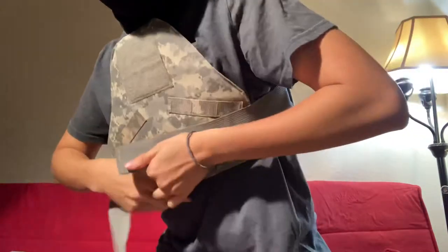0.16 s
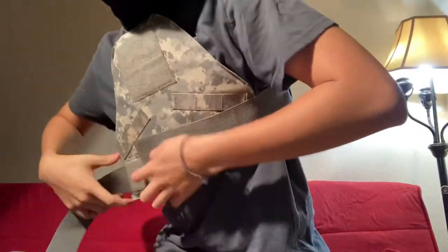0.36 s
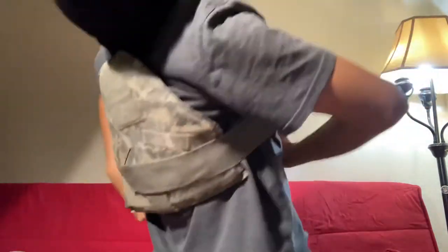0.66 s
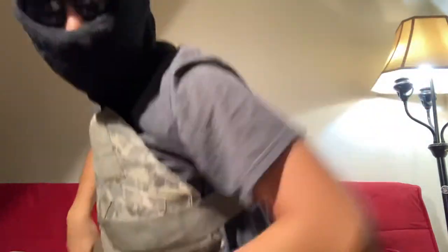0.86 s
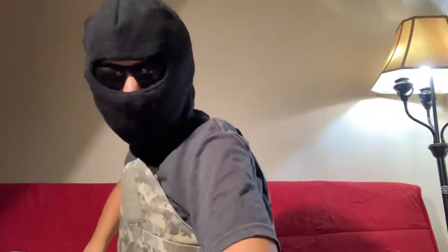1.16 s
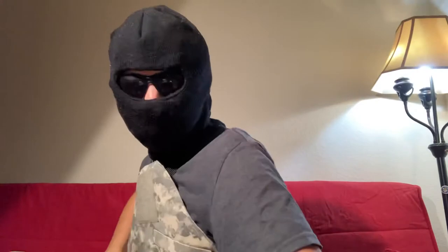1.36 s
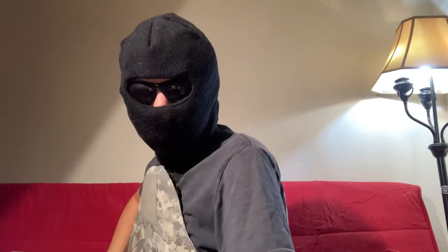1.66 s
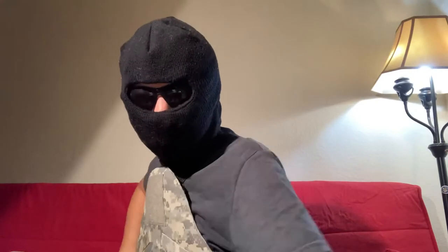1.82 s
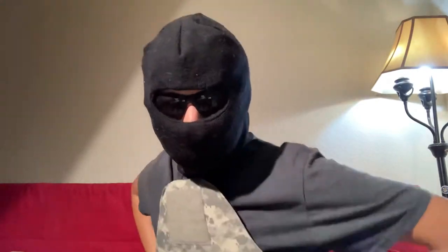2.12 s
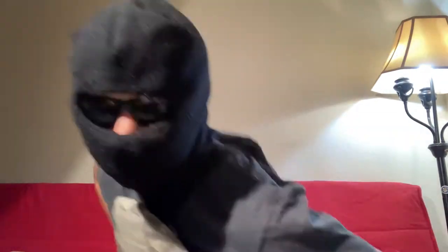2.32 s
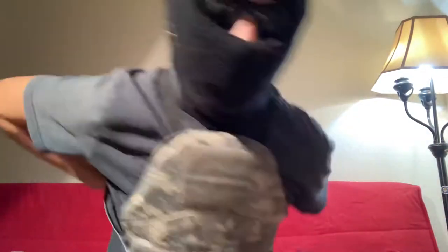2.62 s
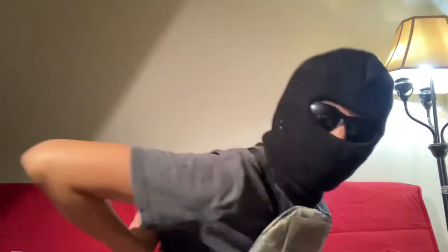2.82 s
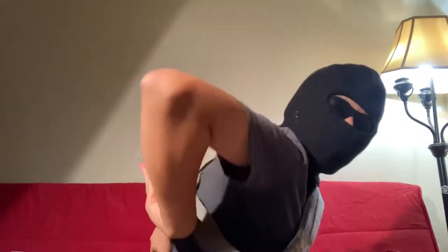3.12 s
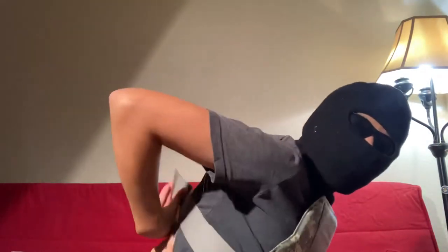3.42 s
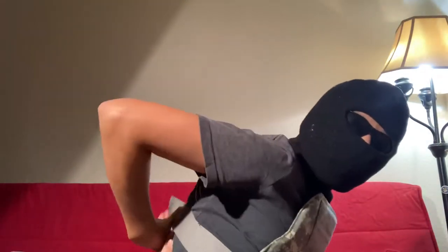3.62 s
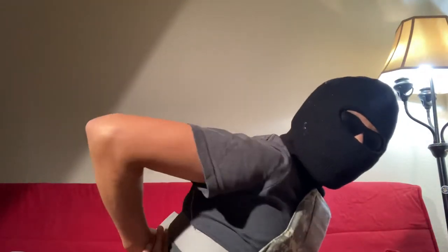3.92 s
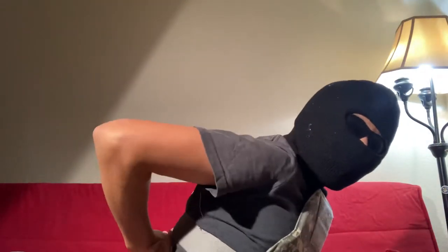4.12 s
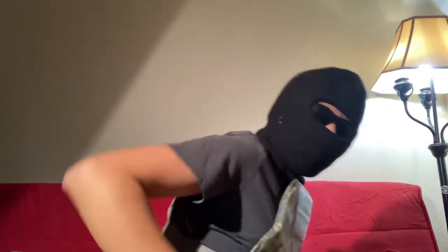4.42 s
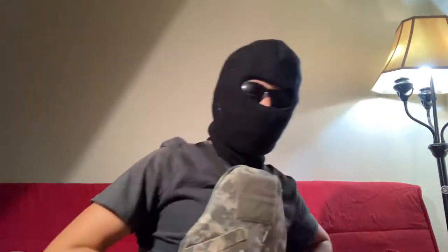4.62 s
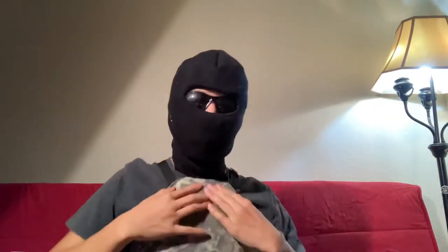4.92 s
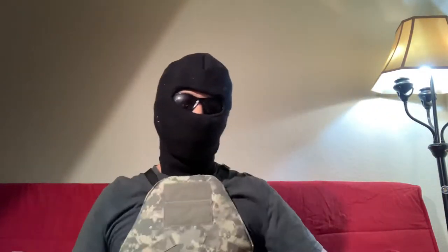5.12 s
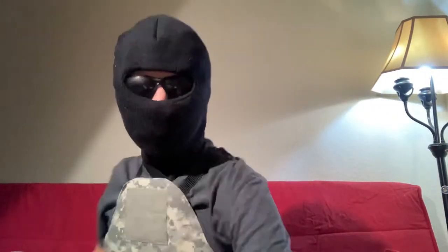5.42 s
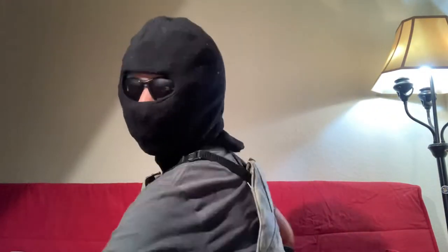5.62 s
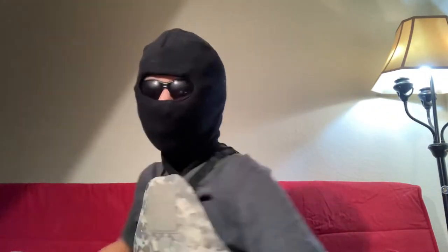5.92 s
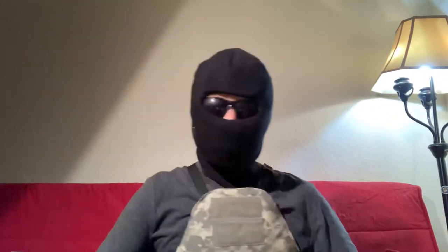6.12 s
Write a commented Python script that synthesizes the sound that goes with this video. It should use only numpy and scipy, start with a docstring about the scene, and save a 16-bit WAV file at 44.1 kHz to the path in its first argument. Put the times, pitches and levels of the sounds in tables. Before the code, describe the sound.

Hook-and-loop straps crackle and rip as a nylon vest is fastened close by, with cloth swishing and soft pats.

```python
"""A quiet living room, where someone fastens a small nylon vest close to a two-port microphone.
Hook-and-loop straps crackle and rip as fibres let go and shake the webbing. Cloth swishes over
cloth, the padding rumbles as the body shifts, and hands pat it with soft thuds. One thin, high
tone sounds early on. Reflections off arms and chest, a short echo and faint room tone surround it."""
import sys
import numpy as np
from scipy import signal
from scipy.fft import rfft, irfft
from scipy.io import wavfile
from scipy.ndimage import uniform_filter1d

SR = 44100
rng = np.random.default_rng(int(sys.argv[2]) if len(sys.argv) > 2 else 0)


def materialize(psi):
    """Save the field psi as 16-bit PCM at rate SR to the path in sys.argv[1].

    A 1-D psi becomes a single channel; in a 2-D psi each row is a channel.
    """
    bounded = np.clip(np.atleast_2d(psi).T, -1, 1)
    quanta = np.round(bounded * 32767).astype(np.int16)
    wavfile.write(sys.argv[1], SR, quanta)


N = 275914


def gain_of(db):
    return 10 ** (np.asarray(db) / 20)


def unit_rms(x):
    return x / np.sqrt(np.mean(x ** 2) + 1e-20)


def curve_at(points, hz):
    f, value = np.transpose(points)
    return np.interp(np.log(hz + 1), np.log(f + 1), value)


def automation(table):
    """Ramps between timed rows, one value per sample for each column."""
    times, *columns = np.transpose(table)
    return [np.interp(np.arange(N) / SR, times, column) for column in columns]


def colour(x, spectrum):
    """A causal EQ of unit energy: the spectrum sets only the tone."""
    log_gain = np.log(gain_of(np.maximum(curve_at(spectrum, abs(np.fft.fftfreq(4096, 1 / SR))), -70)))
    taps = np.fft.ifft(np.exp(signal.hilbert(log_gain).conj())).real[:2048]
    return signal.oaconvolve(x, taps / np.linalg.norm(taps))[:N]


def resonate(x, hz, width_hz):
    """A steep resonance swept along hz, scaled to keep the power of noise."""
    carrier, r = np.exp(2j * np.pi * np.cumsum(hz) / SR), np.exp(-np.pi * width_hz / SR)
    smooth = signal.lfilter([(1 - r) ** 2], [1, -2 * r, r * r], x / carrier)
    return (carrier * smooth).real * np.sqrt(8 / (1 - r))


def slips(per_s, spread_db, clump_db, clump_s):
    """Fibres slip as tiny clicks of random sign, a few large, coming in clumps."""
    size = gain_of(spread_db * np.minimum(rng.exponential(1, N), 3.6)) * rng.choice([-1., 1.], N)
    clumps = unit_rms(uniform_filter1d(rng.standard_normal(N), max(round(clump_s * SR), 2)))
    return unit_rms(size * (rng.random(N) < per_s / SR) * gain_of(clump_db * clumps))


# Strokes of hands and cloth over the vest:
# (start [s], rise [s], hold [s], fall [s], strap force [dB], cloth force [dB], webbing resonance [dB])
SLIDES = [(-.01, 0.014, 0.0044, 0.02, -60.5, -55, -6.5), (-.02, 0.0067, 0.41, 0.02, -68.5, -61.5, 5),
          (0.124, 0.061, .005, 0.08, -52, -57, 3), (0.417, 0.032, 0.066, 0.097, -77.5, -73, 3.5),
          (0.565, 0.036, .005, 0.19, -72.5, -67.5, 6), (0.684, 0.023, .02, 0.036, -76.5, -70, 3.5),
          (0.736, 0.08, 0.31, 0.044, -80, -64.5, 9.5), (0.864, 0.041, .005, 0.24, -62.5, -56.5, 2),
          (0.981, 0.045, 0.025, 0.15, -60.5, -61, 4.5), (1.137, 0.036, .01, 0.059, -48, -49.5, 3),
          (1.222, 0.032, 0.026, 0.023, -39.5, -46.5, 4), (1.342, .008, 0.068, 0.095, -49.5, -46.5, -0.5),
          (1.457, 0.031, 0.4, .05, -75, -79, -0.5), (1.64, 0.055, 0.29, 0.23, -68.5, -66, 2.5),
          (2.009, 0.02, 0.003, 0.053, -73.5, -50.5, 21), (2.133, 0.048, .005, 0.093, -71.5, -60, 12.5),
          (2.21, 0.061, .14, 0.11, -70, -64, 3.5), (2.415, 0.061, 0.36, 0.18, -70, -62.5, 5.5),
          (2.601, 0.08, 0.023, 0.17, -87, -53.5, 20), (2.695, 0.041, .005, 0.035, -68, -78, 8),
          (2.848, 0.065, 0.23, 0.16, -63, -63, 1.5), (2.986, 0.066, 0.0043, 0.076, -61, -43, 21),
          (3.126, 0.064, .005, 0.074, -57, -48.5, 3.5), (3.185, 0.047, 0.16, 0.039, -67, -64, 4),
          (3.359, 0.11, 0.014, 0.036, -51, -54.5, 2.5), (3.51, 0.015, 0.14, 0.063, -53.5, -66, 0.5),
          (3.611, 0.04, 0.0032, 0.064, -42.5, -46.5, 0), (3.71, 0.12, 0.078, .03, -66.5, -82, 0),
          (3.919, 0.02, .005, 0.31, -58.5, -76, -1), (4.1, 0.04, .005, 0.12, -57.5, -64.5, 2),
          (4.245, 0.057, 0.0057, 0.066, -63.5, -64, 1), (4.36, 0.024, 0.0036, 0.067, -91, -76.5, 12),
          (4.519, 0.013, .005, 0.14, -65, -60.5, 2.5), (4.587, 0.02, 0.11, 0.033, -92, -70.5, 10.5),
          (4.737, 0.015, 0.0029, 0.015, -52, -39, 5.5), (4.748, .02, 0.2, 0.018, -70, -69, 2),
          (4.983, 0.085, 0.045, .07, -72.5, -61, 11), (5.205, 0.12, 0.18, 0.07, -66.5, -54, 9.5),
          (5.294, 0.21, 0.065, 0.062, -65.5, -51.5, 11.5), (5.59, 0.031, 0.039, 0.0495, -85, -72, 8),
          (5.784, 0.11, 0.076, .1, -81.5, -65, 10.5), (5.824, 0.19, 0.21, 0.054, -69, -55, 8.5)]
def slides():
    """Each stroke swells, holds and fades; the strongest on the straps sets the webbing's resonance."""
    t, power = np.arange(0, N / SR + .01, .002), 1e-14
    ramp_db = 25  # travel over one rise or fall
    for start, rise, hold, fall, straps_db, cloth_db, webbing_db in SLIDES:
        attack = (start + rise - t) / max(rise, .005)
        release = (t - start - rise - hold) / max(fall, .005)
        dip_db = ramp_db * np.maximum(np.maximum(attack, release), 0)
        strap_power, cloth_power = gain_of(np.array([[straps_db], [cloth_db]]) - dip_db) ** 2
        power = power + np.array([strap_power, cloth_power, strap_power * webbing_db])
    pull, rub, webbing_db = np.sqrt(power[0]), np.sqrt(power[1]), power[2] / power[0]
    return [np.interp(np.arange(N) / SR, t, curve) for curve in (pull, rub, webbing_db)]


# Bite of the hooks and sizzle of the finest ones: (frequency [Hz], relative level [dB])
HOOK_EQ = [(2000, -61), (4000, -1), (5000, 8), (7000, 5.5), (9200, 1), (12500, -23)]
SIZZLE_EQ = [(6000, -48.5), (9500, 5), (11000, 10), (13000, 7.5), (15500, 8), (17000, -7.5)]
# Fader ride on the sizzle: (time [s], relative level [dB])
SIZZLE_RIDE = [(0, -5), (.8, 2.5), (1.2, 2), (1.45, 0.5), (2.0, -1.5), (2.9, -2), (3.7, -5), (4.4, -6.5),
               (5.0, -10), (6.26, -2)]
def straps(pull, tug, webbing_db):
    """Hissing loops and tearing hooks shake the webbing; slack webbing rings more, lower and duller."""
    sizzle_db = automation(SIZZLE_RIDE)[0] - 1.25 * webbing_db
    webbing_hz = 2865 - 36 * webbing_db
    force = np.hypot(pull, tug)
    # Hard, bright pulls tear hooks; dull slides do not.
    torn_share = np.clip(0.63 + 0.0084 * (20 * np.log10(force) + 65) - 0.065 * webbing_db, 0, .5)
    tearing = slips(per_s=1500, spread_db=2.6, clump_db=1.4, clump_s=0.005)
    loops = slips(per_s=14000, spread_db=1.5, clump_db=1.8, clump_s=0.011)
    drive = force * (np.sqrt(1 - torn_share) * loops + np.sqrt(torn_share) * tearing)
    ring = resonate(drive * gain_of(webbing_db), webbing_hz, width_hz=2400)
    webbing = signal.lfilter(*signal.butter(2, 1500, "high", fs=SR), ring)
    sizzle = colour(drive * gain_of(sizzle_db), SIZZLE_EQ)
    return gain_of(4) * colour(drive, HOOK_EQ) + gain_of(6) * sizzle + gain_of(-0.4) * webbing


# Tone of the weave and of the padding: (frequency [Hz], relative level [dB])
WEAVE_EQ = [(150, -43.5), (330, -17), (520, 0.5), (800, -4.5), (1150, 3), (1450, -0.5), (1850, -4.5),
            (3500, -19.5)]
PADDING_EQ = [(40, -45), (80, -16.5), (120, -0.5), (160, 0.5), (230, -13), (330, -6), (600, -33)]
# The body shifting under the vest: (time [s], rumble drive [dB], pitch of the cloth fold [Hz])
BODY_SHIFTS = [(0.0, -71, 1020), (0.4, -67.5, 975), (0.71, -69.5, 820), (1.22, -81, 1285), (1.62, -78, 830),
               (1.74, -95, 1290), (2.14, -64.5, 694), (2.23, -73.5, 999), (2.65, -64.5, 745),
               (3.06, -73, 1120), (3.15, -70, 750), (3.55, -72.5, 960), (3.98, -92.5, 900),
               (4.55, -74.5, 898), (4.75, -78.5, 890), (5.2, -69, 770), (5.36, -62, 1000),
               (5.52, -59.5, 952), (5.68, -85, 700), (5.85, -75, 731), (6.1, -66.5, 690), (6.26, -85, 660)]
def cloth(rub, tug):
    """Rubbing threads make a soft swish with a wandering hollow; the padding under them rumbles."""
    rumble_db, fold_hz = automation(BODY_SHIFTS)
    threads = slips(per_s=8000, spread_db=1.8, clump_db=1.0, clump_s=0.014) * np.hypot(rub, tug)
    hollow = resonate(threads, fold_hz, width_hz=900)
    swish = gain_of(-7.5) * colour(threads, WEAVE_EQ) + gain_of(-3.5) * hollow
    padding = slips(per_s=4800, spread_db=0.75, clump_db=1.3, clump_s=0.024) * gain_of(rumble_db)
    return swish + gain_of(-3) * colour(padding, PADDING_EQ)


# Likeness of diffuse sound at the two ports: (frequency [Hz], correlation [0-1])
PORT_LIKENESS = [(100, .985), (500, .9), (1500, .4), (3000, .1), (15000, .1)]
def diffuse_spectra(frames, hz):
    """Short-time noise spectra for two ports, centred in the bass and wide in the treble."""
    a, b, c, d = rng.standard_normal((frames, len(hz), 4)).T
    likeness = curve_at(PORT_LIKENESS, hz)[:, None]
    left = a + 1j * b
    right = likeness * left + np.sqrt(1 - likeness ** 2) * (c + 1j * d)
    return np.ascontiguousarray([left, right])


# The room's noise bed: (frequency [Hz], relative level [dB])
ROOM_TONE_EQ = [(20, -17.5), (45, -16.5), (85, 3.5), (135, 7.5), (400, -8), (580, -0.5), (1040, -9.5),
                (1500, -13.5), (3000, -15.5), (4300, -17), (10000, -19), (16000, -27.5)]
def room_tone():
    """A quiet, steady bed of rumble and hiss."""
    hz = np.fft.rfftfreq(1024, 1 / SR)
    spectra = diffuse_spectra(N // 256 + 5, hz) * gain_of(curve_at(ROOM_TONE_EQ, hz))[:, None]
    return gain_of(-74) * unit_rms(signal.istft(spectra, nperseg=1024, noverlap=768)[1][:, :N])


# Single hooks letting go: (time [s], snap drive [dB], ring drive [dB], knock drive [dB], ring pitch [Hz])
HOOK_SNAPS = [(0.0105, -35, -43, -42, 3370), (0.0207, -30.5, -45, -35, 3270), (0.138, -45, -48, -40, 2550),
              (0.1984, -23.5, -46, -37, 3300), (0.2453, -60, -41.5, -42, 2340),
              (0.276, -45, -64, -35, 2760), (0.316, -58, -45, -46, 2950), (0.8746, -58, -64, -64, 2280),
              (0.8983, -44, -70, -63, 2840), (0.9231, -37, -48, -40, 1980), (1.0241, -59, -51, -34, 2370),
              (1.036, -48, -36, -52, 2780), (1.0527, -32, -37, -62, 3330), (1.0974, -42, -69, -29.5, 3080),
              (1.156, -29.5, -36, -59, 3330), (1.1627, -24, -32, -35, 3350),
              (1.1719, -21.5, -47, -37, 3030), (1.1862, -23, -47, -35, 2460), (1.2094, -26, -35, -52, 3190),
              (1.351, -15, -44, -35, 3660), (1.3613, -17, -38, -32, 3550), (2.9472, -27, -45, -52, 2400),
              (2.9896, -45, -37, -58, 2400), (2.9998, -37, -33.5, -56, 2320),
              (3.0095, -25.5, -35, -54, 3400), (3.0347, -46, -29.5, -51, 1990),
              (3.0542, -48, -34, -44, 2300), (3.0591, -48, -18.5, -41, 2430), (3.1761, -45, -29, -37, 2100),
              (3.1886, -50, -60, -36, 3200), (3.3232, -61, -48, -38, 2060), (3.4582, -40, -31, -46, 3820),
              (3.469, -45, -33.5, -63, 2150), (3.5464, -51, -39, -40, 3800), (3.5837, -50, -40, -57, 2220),
              (3.6114, -33, -31.5, -43, 3320), (3.797, -45, -60, -55, 3550), (3.836, -41, -49, -74, 3850),
              (3.9403, -31, -60, -71, 3030), (4.0072, -47, -46.5, -50, 2460),
              (4.0636, -54, -41.5, -63, 3170), (4.1584, -45, -62, -42, 3560),
              (4.537, -31.5, -51, -38.5, 1940), (4.5868, -38.5, -55, -61, 2500),
              (4.7432, -42, -46, -35, 1910), (4.7535, -29.5, -39, -31.5, 2670)]
def hook_snaps():
    """Each hook is a sharp burst with a faint tail; it plucks the webbing and knocks the cloth."""
    length = 900
    t, drive, rings = np.arange(length) / SR, np.zeros((2, N + length)), np.zeros(N + length)
    burst = np.exp(-t / .0005) + 0.038 * np.exp(-t / 0.0048)
    pluck = t / 0.00035 * np.exp(1 - t / 0.0005)
    for start, snap_db, ring_db, knock_db, hz in HOOK_SNAPS:
        at = slice(round(start * SR), round(start * SR) + length)
        drive[:, at] += gain_of([[snap_db], [knock_db]]) * burst * rng.choice([-1., 1.], length)
        rings[at] += gain_of(ring_db) * pluck * np.sin(2 * np.pi * hz * t)
    snap = colour(drive[0], HOOK_EQ) + 0.6 * colour(drive[0], SIZZLE_EQ)
    knock = colour(drive[1], WEAVE_EQ)
    return gain_of(-3.5) * snap + gain_of(-4) * rings[:N] + gain_of(2) * knock


# Sudden tugs and brushes: (time [s], peak drive [dB], cloth relative to straps [dB], 60 dB decay [s])
TUGS = [(0.1764, -37, -17, 0.056), (0.198, -27.5, 0.5, 0.024), (0.6137, -41, -12, 0.026),
        (0.8744, -49, 17, 0.031), (0.9197, -34, 7, 0.033), (1.025, -46.5, 20.5, 0.054),
        (1.051, -40, -11, 0.038), (1.154, -50, -13, 0.048), (1.1707, -42, -18.5, 0.077),
        (1.2465, -35, -1, 0.15), (1.265, -25, -22, 0.27), (1.279, -20.5, -1.5, 0.12),
        (1.321, -35, -31, 0.063), (1.3513, -20, -4, 0.066), (1.385, -27, -24, 0.086),
        (1.394, -23.5, -9, 0.085), (1.4058, -17.5, -7.5, 0.084), (1.695, -65, 29.5, .04),
        (1.723, -58, 22, .03), (1.815, -67.5, 18, 0.12), (2.0274, -66, 21, 0.063), (2.1802, -52, 3.5, 0.15),
        (2.946, -46.5, -24.5, 0.095), (2.9895, -43.5, 2.5, 0.21), (3.031, -51, 21, 0.03),
        (3.054, -32.5, 5.5, 0.085), (3.1744, -63, -5.5, 0.059), (3.322, -46, 8.5, 0.2),
        (3.429, -47.5, -3, 0.23), (3.4674, -41, -4, 0.06), (3.5274, -52, 1, 0.1),
        (3.5844, -40.5, -19, 0.11), (3.6406, -40, -15, 0.05), (3.874, -48.5, -11, 0.12),
        (3.939, -39, -13, 0.093), (3.984, -46, -4.5, 0.16), (4.0615, -41.5, -2, 0.047),
        (4.13, -60, 12, 0.018), (4.3946, -72, 27, 0.065), (4.5233, -48.5, 9, 0.075),
        (4.742, -36.5, 17, 0.045), (4.794, -51, 8, 0.19), (4.945, -49, 0, 0.083),
        (5.253, -64.5, 19.5, 0.061)]
def tugs():
    """Each tug hits fast and fades; returns its force on the straps and on the cloth."""
    length, attack_s = 6000, .002
    crest_db = 9  # crackle peaks over its mean force
    t, force = np.arange(length) / SR, np.zeros((2, N + length))
    for start, db, cloth_db, t60 in TUGS:
        envelope = gain_of(db - crest_db - 60 * t / t60) * (1 - np.exp(-t / attack_s))
        at = round(start * SR)
        force[:, at:at + length] += gain_of([[0], [cloth_db]]) * envelope
    return force[:, :N]


# A thin, high tone: (time [s], relative level [dB], pitch [Hz], 60 dB decay [s])
THIN_TONE = [(.978, -34.5, 12480, 0.091)]
def thin_tone():
    """One short, thin, very high tone that fades quickly."""
    (start, db, hz, t60), = THIN_TONE
    t = np.maximum(np.arange(N) / SR - start, 0)
    return gain_of(db - 60 * t / t60) * (1 - np.exp(-t / 0.0045)) * np.sin(2 * np.pi * hz * t)


# Hands and arms landing on the padding:
# (time [s], relative level [dB], settled pitch [Hz], 60 dB decay [s])
PATS = [(1.416, -37.5, 161.3, 0.1), (2.027, -47, 176, 0.058), (2.664, -48.5, 198, 0.14),
        (2.685, -45.5, 186, 0.075), (2.706, -47.5, 145, 0.1), (2.796, -46, 167.5, 0.11),
        (3.013, -56, 200, 0.28), (3.071, -46.5, 176, 0.091), (3.185, -43.5, 261, 0.056),
        (3.324, -45, 193, 0.18), (3.341, -41, 173, 0.079), (3.364, -44, 153, 0.026),
        (3.693, -54.5, 161.6, 0.087), (4.536, -54, 165.4, 0.075), (4.754, -43, 160, 0.065),
        (5.46, -55.5, 165, 0.13), (5.894, -59.5, 170, .06)]
def pats():
    """A soft thud whose pitch sags quickly as the padding gives, over a deeper push of the chest."""
    length, attack_s, chest_gain = 9000, .003, .3
    t, thuds = np.arange(length) / SR, np.zeros(N + length)
    for start, db, hz, t60 in PATS:
        phase = 2 * np.pi * hz * (t + 0.0044 * (1 - np.exp(-t / 0.0038)))
        envelope = gain_of(db - 60 * t / t60) * (1 - np.exp(-t / attack_s))
        at = round(start * SR)
        thuds[at:at + length] += envelope * (np.sin(phase) + chest_gain * np.sin(0.62 * phase))
    return thuds[:N]


# Stereo placement of the vest: (frequency [Hz], phase lead of the left port [rad])
LEFT_LEAD = [(100, -2), (1100, 1), (2500, 0.56), (3500, 1.55), (4500, 3), (7000, 3.5), (9000, 4.5),
             (11000, 3.5), (13000, 2), (15000, 7)]
def close_up(x):
    """Direct sound whose image wanders as the hands move, plus reflections off arms and chest."""
    hz, t, spectra = signal.stft(x, SR, nperseg=256, noverlap=192)
    treble = np.clip(hz / 2200, 0, 1)[:, None]  # long waves bend around the body
    jitter = rng.standard_normal(spectra.shape[::-1]).T
    wander = unit_rms(uniform_filter1d(uniform_filter1d(jitter, 14, axis=1), 9, axis=0))
    half_lead = np.exp(.5j * (curve_at(LEFT_LEAD, hz)[:, None] + 0.98 * treble * wander))
    direct = np.array([half_lead, 1 / half_lead])
    scatter = diffuse_spectra(len(t), hz).view(float).reshape(2, len(hz), -1, 2)  # real, imaginary
    patches = uniform_filter1d(uniform_filter1d(scatter, 20, axis=2), 6, axis=1)
    reflections = .36 * treble * (unit_rms(patches) @ [1, 1j])
    return signal.istft(spectra * (direct + reflections), nperseg=256, noverlap=192)[1][:, :N]


# Reverb time of the living room: (frequency [Hz], 60 dB decay [s])
ROOM_DECAY = [(100, 0.42), (500, 0.059), (2000, 0.1), (6000, 0.13), (15000, 0.05)]
def room_echo(x):
    """Echoes off sofa and walls, each band at its own decay; three tails crossfade as the body moves."""
    hz, t = np.fft.rfftfreq(256, 1 / SR), np.arange(150) * 64 / SR
    decay = gain_of(-60 * t / curve_at(ROOM_DECAY, hz)[:, None])
    wet, crossfade = 0, np.pi * 6.5 * np.arange(N) / SR
    for k in range(3):
        tail = signal.istft(diffuse_spectra(len(t), hz) * decay, nperseg=256, noverlap=192)[1]
        tail = tail * (1 - np.exp(-np.arange(tail.shape[1]) / SR / 0.002))
        send = x * np.cos(crossfade + k * np.pi / 3) * np.sqrt(2 / 3)
        wet = wet + signal.oaconvolve(send[None], tail / np.linalg.norm(tail[0]), axes=1)[:, :N]
    return wet


def scene():
    """The vest's rustles share the chest's reflections and the room; thuds arrive mostly dry."""
    pull, rub, webbing_db = slides()
    strap_tug, cloth_tug = tugs()
    vest = straps(pull, strap_tug, webbing_db) + hook_snaps() + cloth(rub, cloth_tug) + thin_tone()
    thuds = pats()
    foreground = gain_of(-2) * close_up(vest) + gain_of(5) * thuds
    return foreground + gain_of(-10) * room_echo(vest + 0.5 * thuds) + room_tone()


# Shape of the lean to the left port: (frequency [Hz], tilt before scaling [dB])
PORT_TILT = [(60, -2.5), (180, -0.5), (550, -0.5), (1650, 4.5), (4970, 6.5), (15000, 1.5)]
def record(dry):
    """The left port is brighter than the right; both lose the deep bass and the very top."""
    low_cut_hz, high_cut_hz = 62, 15900
    hz = np.fft.rfftfreq(N, 1 / SR)
    tilt = gain_of(0.32 * curve_at(PORT_TILT, hz))
    low_cut = (hz / low_cut_hz) ** 3 / np.sqrt(1 + (hz / low_cut_hz) ** 6)
    ports = irfft(rfft(dry) * low_cut * np.array([tilt, 1 / tilt]), N)
    high_cut = signal.firwin(511, high_cut_hz, window=("kaiser", 9), fs=SR)
    return signal.oaconvolve(ports, high_cut[None], "same")


dry = scene()
out = record(dry)
materialize(out)
```